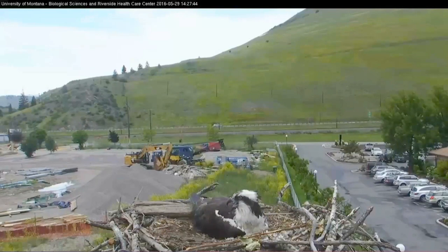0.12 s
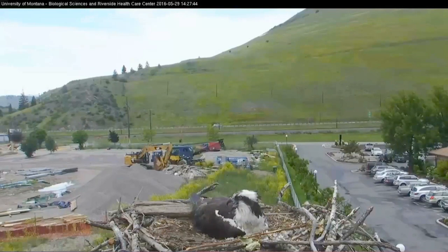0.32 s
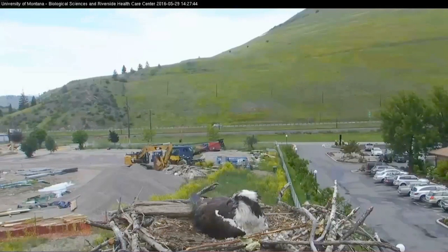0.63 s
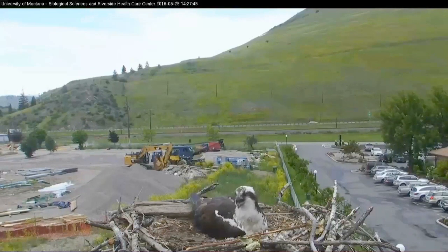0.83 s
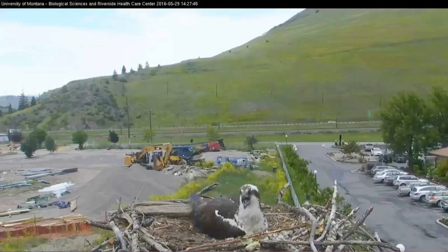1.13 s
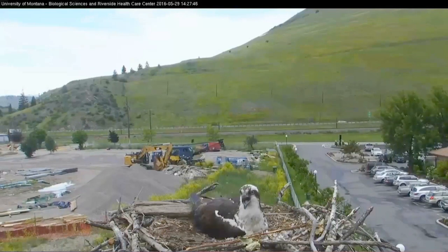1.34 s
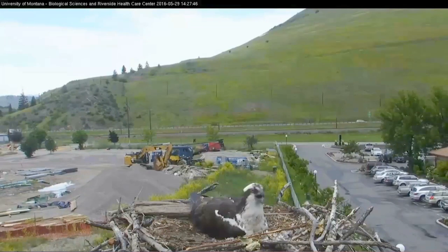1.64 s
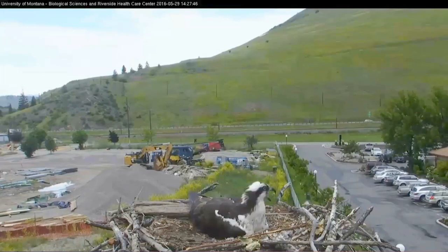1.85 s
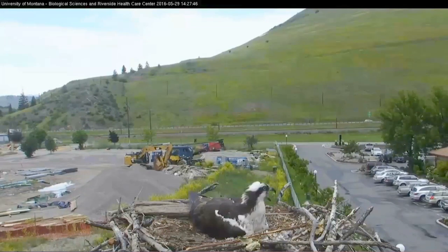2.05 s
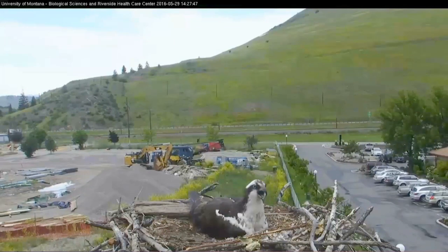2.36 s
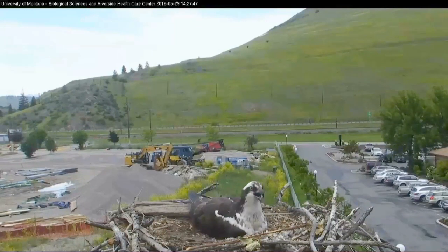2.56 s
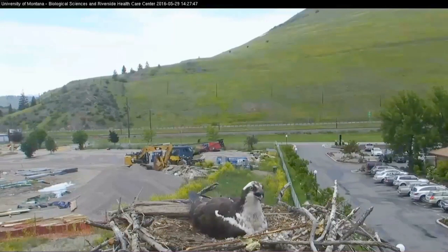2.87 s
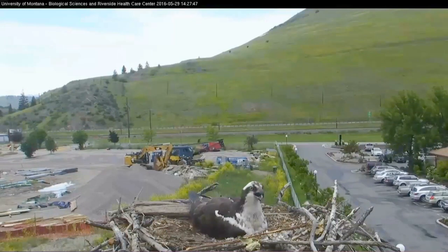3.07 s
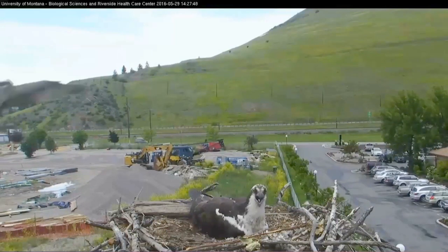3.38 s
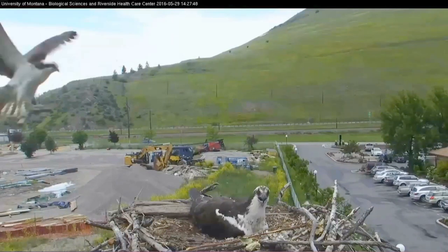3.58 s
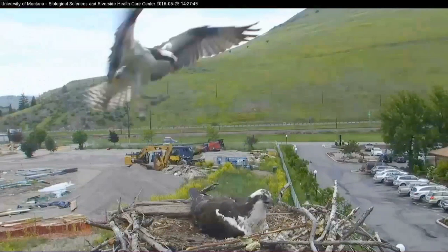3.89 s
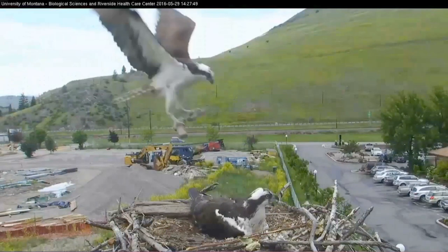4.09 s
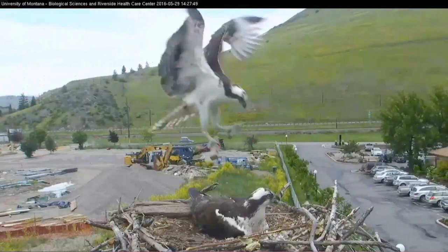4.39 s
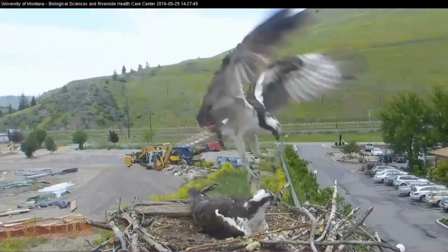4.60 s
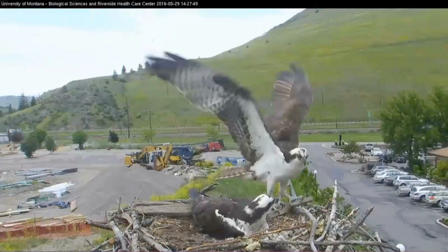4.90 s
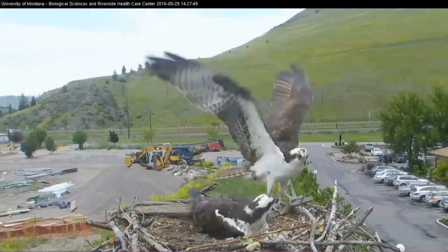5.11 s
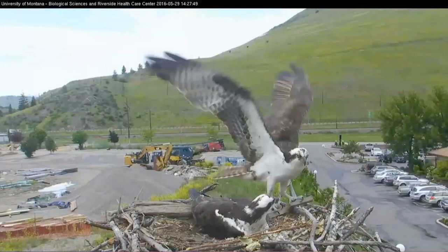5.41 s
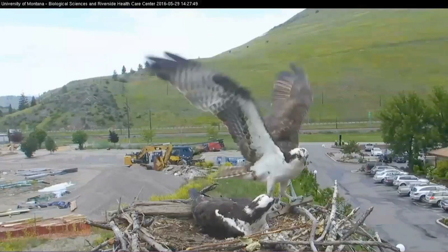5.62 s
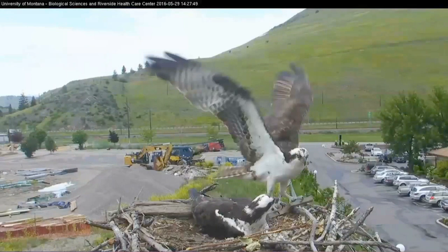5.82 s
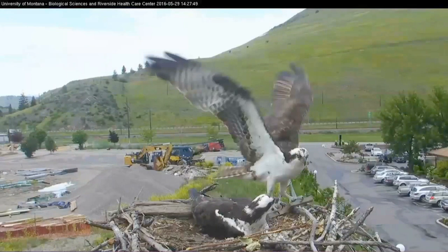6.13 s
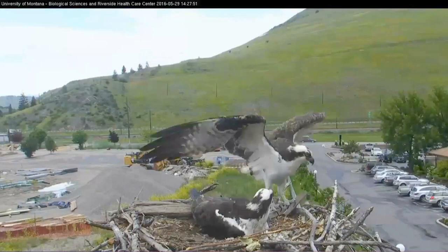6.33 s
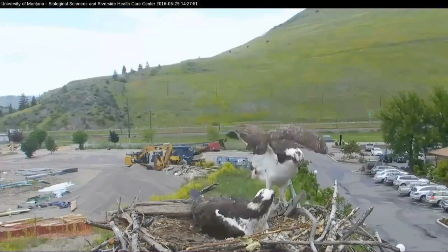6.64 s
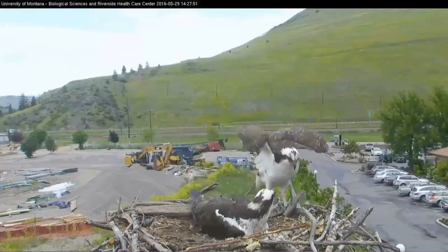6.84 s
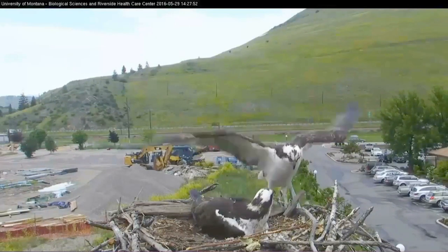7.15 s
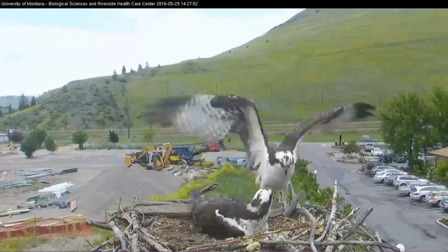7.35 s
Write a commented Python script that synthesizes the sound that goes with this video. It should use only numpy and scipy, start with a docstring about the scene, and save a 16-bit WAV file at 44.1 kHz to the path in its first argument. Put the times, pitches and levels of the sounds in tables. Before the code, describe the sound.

An osprey on its nest whistles a nonstop run of rapid, shrill, cracking chirps, then gentler ones as its mate lands, over faint distant traffic hum.

```python
"""A large raptor on its nest whistles a long run of chirps; each climbs, breaks between registers and falls.
Its mate lands with a short peep and a scrape of sticks; far traffic hums and the slopes send back a faint echo.
Whistles are near sines on drawn pitch paths; breath, scrapes, traffic and echo are shaped noise.
A camera microphone changes the sample rate crudely, which mirrors every whistle."""
import sys
import numpy as np
from scipy import signal
from scipy.fft import rfft, irfft
from scipy.io import wavfile
from scipy.ndimage import uniform_filter1d

SR = 44100
rng = np.random.default_rng(int(sys.argv[2]) if len(sys.argv) > 2 else 0)


def store_wav(level_fs):
    """Save 16-bit WAV to argv[1]."""
    pcm = np.round(np.clip(np.atleast_2d(level_fs), -1, 1) * 32767)
    wavfile.write(sys.argv[1], SR, pcm.T.astype(np.int16))


N = 332073

# Chirps that crack between registers, most of them blown hard, a few softly; five groups each:
# climb (onset_s, pickup_db, onset_db, shelf_hz, end_s, end_hz, end_db),
# squeak (top_s, top_hz, top_db, gap_hz, gap_db),
# plunge (start_s, start_hz, start_db, burst_s, burst_hz, burst_db),
# arch (crest_s, crest_hz, crest_db, leave_s, leave_db), fall (from_hz, break_s, break_db, end_s)
CRACKED_CHIRPS = [
    [(-0.03, -30, -20, 2800, 0.001, 2900, -24), (0.014, 4675, -14, 4750, -15),
     (0.029, 4790, -15, 0.041, 3445, -8), (0.058, 4535, -16, 0.072, -8), (4240, 0.086, -12, 0.1)],
    [(0.184, -21, -9, 2975, 0.207, 2870, -17), (0.223, 5010, -17, 4900, -16),
     (0.231, 4600, -14, 0.243, 3600, -6), (0.259, 4610, -15, 0.273, -10), (4370, 0.287, -13, 0.299)],
    [(0.386, -26, -16, 3125, 0.412, 3050, -23), (0.425, 5600, -26, 3700, -44),
     (0.443, 4565, -27, 0.45, 3670, -6), (0.468, 5400, -18, 0.486, -14), (4500, 0.5, -15, 0.514)],
    [(0.6, -34, -10, 3050, 0.626, 3065, -24), (0.645, 5400, -33, 3800, -46),
     (0.659, 4500, -26, 0.666, 3550, -9), (0.686, 5750, -15, 0.702, -15), (4430, 0.713, -9, 0.725)],
    [(0.816, -28, -11, 2850, 0.834, 2900, -24), (0.857, 5600, -19, 3500, -36),
     (0.876, 4920, -16, 0.884, 3820, -7), (0.901, 5420, -12, 0.92, -10), (4030, 0.933, -11, 0.944)],
    [(1.04, -22, -10, 2800, 1.058, 2975, -27), (1.077, 5900, -20, 3500, -45),
     (1.101, 5050, -21, 1.109, 3950, -3), (1.128, 5520, -10, 1.148, -18), (4200, 1.16, -14, 1.173)],
    [(1.259, -34, -9, 2930, 1.279, 3065, -30), (1.298, 5600, -24, 5800, -52),
     (1.324, 5600, -41, 1.332, 4050, -9), (1.352, 5550, -2, 1.372, -13), (4165, 1.385, -12, 1.397)],
    [(1.485, -26, -13, 2800, 1.503, 2980, -30), (1.52, 5600, -23, 5900, -53),
     (1.547, 5900, -43, 1.554, 4100, -8), (1.576, 5520, -4, 1.593, -17), (4130, 1.607, -13, 1.619)],
    [(1.706, -28, -10, 2880, 1.729, 3070, -30), (1.743, 5400, -21, 3500, -48),
     (1.769, 4715, -26, 1.778, 3725, -7), (1.799, 5700, -3, 1.822, -12), (4210, 1.833, -11, 1.848)],
    [(1.924, -21, -9, 3100, 1.943, 3185, -18), (1.945, 4285, -20, 4150, -22),
     (1.974, 4900, -20, 1.993, 3800, -6), (2.016, 5750, -10, 2.039, -11), (4335, 2.052, -10, 2.065)],
    [(2.152, -21, -11, 3000, 2.183, 3000, -19), (2.199, 5225, -21, 3840, -21),
     (2.208, 4850, -20, 2.221, 3750, -4), (2.24, 4530, -13, 2.259, -11), (4410, 2.272, -10, 2.287)],
    [(2.38, -28, -11, 2930, 2.402, 2800, -20), (2.431, 6600, -20, 3500, -18),
     (2.444, 4650, -15, 2.453, 3495, -8), (2.471, 4380, -13, 2.487, -14), (4350, 2.5, -10, 2.516)],
    [(2.608, -28, -11, 2680, 2.63, 2745, -21), (2.648, 5150, -16, 3700, -54),
     (2.68, 4750, -18, 2.69, 3520, -5), (2.709, 4260, -14, 2.719, -14), (4200, 2.734, -11, 2.753)],
    [(2.848, -34, -17, 2600, 2.862, 2600, -19), (2.885, 5000, -30, 3750, -52),
     (2.916, 4300, -25, 2.922, 3575, -7), (2.943, 4225, -24, 2.957, -14), (3650, 2.969, -16, 2.99)],
    [(3.081, -24, -16, 2780, 3.112, 2900, -28), (3.125, 4865, -23, 5100, -26),
     (3.147, 4300, -22, 3.155, 3450, -8), (3.171, 4040, -17, 3.186, -15), (3680, 3.199, -15, 3.221)],
    [(3.305, -17, -18, 3050, 3.34, 2900, -21), (3.354, 4855, -26, 4950, -30),
     (3.367, 4900, -33, 3.378, 3495, -8), (3.398, 4155, -19, 3.412, -18), (3680, 3.422, -17, 3.444)],
    [(3.529, -19, -21, 2950, 3.544, 3080, -20), (3.548, 3650, -20, 3720, -24),
     (3.582, 3070, -22, 3.6, 3240, -13), (3.62, 3920, -20, 3.634, -18), (3750, 3.646, -17, 3.669)],
    [(6.17, -18, -18, 2750, 6.186, 2900, -18), (6.189, 3150, -18, 2950, -19),
     (6.218, 3150, -17, 6.229, 3150, -10), (6.252, 3020, -11, 6.262, -12), (2980, 6.27, -14, 6.292)],
    [(6.391, -28, -17, 2760, 6.413, 3020, -15), (6.415, 3030, -15, 2870, -20),
     (6.445, 3410, -16, 6.466, 3125, -12), (6.494, 3450, -10, 6.505, -15), (3430, 6.512, -14, 6.536)],
]
STRAIN_HZ = 4250   # above this pitch the voice is strained


def from_db(db):
    """Amplitude gain is ten to the power of a twentieth of the decibels."""
    return 10 ** (np.asarray(db) / 20)


def at_hz(points, hz):
    """Spectrum level, interpolated straight on a logarithmic frequency axis."""
    table_hz, table_db = np.array(points).T
    return np.interp(np.log(hz), np.log(table_hz), table_db)


def coloured(x, spectrum):
    """Spectral shaping: each Fourier component is weighted by the spectrum; the result has rms 1."""
    hz = np.arange(1, len(x) // 2 + 2) * SR / len(x)
    out = irfft(rfft(x) * from_db(at_hz(spectrum, hz)), len(x))
    return out / np.sqrt(np.mean(out ** 2))


def wobble(rate_hz):
    """Random modulation: low-passed white noise of standard deviation 1."""
    low_pass = signal.butter(2, rate_hz, fs=SR, output="sos")
    slow = signal.sosfilt(low_pass, rng.standard_normal(N))
    return slow / np.std(slow)


def traffic():
    """Far traffic and air: broadband noise with a fixed spectrum and a slowly drifting level."""
    # relative density of traffic and air: frequency_hz, level_db (per Hz)
    hum_spectrum = [(100, -33), (170, -10), (250, 0), (370, -8), (740, -32), (1300, -18), (2400, -13),
                    (5200, -21), (6100, -38)]
    level_db = -41 + 1.5 * wobble(4)
    return coloured(rng.standard_normal(N), hum_spectrum) * from_db(level_db)


def slopes(x):
    """Diffuse reverberation: ground and hillside act as exponentially decaying noise convolved with the sound."""
    level_db, t60_s = -36, .5
    tail = rng.standard_normal(SR) * from_db(-60 * np.arange(SR) / SR / t60_s)
    echo = signal.fftconvolve(x, tail / np.sqrt(np.sum(tail ** 2)))[:N]
    return from_db(level_db) * echo


def sticks():
    """Friction noise: claws on sticks give band-limited bursts that start at once and decay exponentially."""
    # scrapes at the landing: start_s, level_db (relative), decay_s
    scrapes = [(4.375, -30, .004), (4.384, -31, .014)]
    t = np.arange(N) / SR
    envelope = sum(from_db(db) * (t > s) * np.exp(-np.abs(t - s) / decay_s) for s, db, decay_s in scrapes)
    band = signal.butter(2, [1600, 6000], "band", fs=SR, output="sos")
    return envelope * signal.sosfilt(band, 2 * rng.standard_normal(N))


def crackle():
    """Loss of periodicity: around each high plunge's start the strained voice splinters into fluttering noise."""
    # relative density of the hoarse noise: frequency_hz, level_db (per Hz)
    hoarse_spectrum = [(2300, -24), (3300, -3), (3800, 0), (4600, -4), (6000, -7), (8500, -9), (11000, -12)]
    level_db = -8   # against the effort at the plunge's start
    lead_s, stop_s, edge_s = .010, .003, .003   # before the start, before the burst, fade length
    t = np.arange(N) / SR
    envelope = np.zeros(N)
    for chirp in CRACKED_CHIRPS:
        start, start_hz, start_db, burst = chirp[2][:4]
        if start_hz > STRAIN_HZ:
            gate = np.clip(np.minimum(t - start + lead_s, burst - stop_s - t) / edge_s, 0, 1)
            envelope += from_db(start_db + level_db) * gate
    return envelope * from_db(3 * wobble(150)) * coloured(rng.standard_normal(N), hoarse_spectrum)


def point(s, hz, db, next_hz):
    """Register break: the pitch jumps only if the next pitch lies over 0.05 away in log frequency."""
    return (s, hz, db, next_hz) if abs(np.log(next_hz / hz)) > .05 else (s, hz, db)


def landing_hz(drop, end):
    """Final glide: a longer last slide starts higher, up to a ceiling."""
    return min(2900, 2020 + 40000 * (end - drop))   # Hz, 40000 Hz per s


def last(drop, end):
    """End of the glide: a hasty slide ends lower."""
    return end, min(2330, 2080 + 11000 * (end - drop)), -21


def climb(on, pickup_db, on_db, shelf_hz, end, end_hz, end_db, hard):
    """Register shift: a low pick-up breaks upwards to a shelf; blown hard, it bursts in and steps up again."""
    attack_s = .006 if hard else 0
    shelf_db = on_db + .33 * (end_db - on_db)
    if hard:
        rise = [(on, 2570, on_db), point(on + .006, min(2660, shelf_hz), shelf_db, shelf_hz)]
    else:
        rise = [(on + .009, shelf_hz, shelf_db)]
    return [(on - attack_s - .008, 1900, pickup_db),
            (on - attack_s, 2070, min(pickup_db, on_db), 2330 if hard else 2620),
            *rise,
            (end, end_hz, end_db)]


def plain(rise, hold, fall):
    """Sustained upper register: one leap, a sag and a crest; rows (s, pitch Hz, effort dB, leap Hz)."""
    *opening, shelf = climb(*rise, False)
    leap, sag, crest = hold[:1], hold[1:4], hold[4:]
    from_hz, drop, db, end = fall
    return opening + [shelf + leap, sag, crest,
                      (drop, from_hz, db, landing_hz(drop, end)), last(drop, end)]


def cracked(rise, squeak, plunge, arch, fall):
    """Unstable registers: a squeak, a gap, a plunge, a hiccup into an arch and a fall; rows as in plain."""
    top, top_hz, top_db, gap_hz, gap_db = squeak
    start, start_hz, start_db, burst, burst_hz, burst_db = plunge
    crest, crest_hz, crest_db, leave, leave_db = arch
    from_hz, drop, db, end = fall
    hard = rise[2] > rise[1]   # onset stronger than pick-up
    high, strained = crest_hz > 5000, start_hz > STRAIN_HZ

    fade = min(.005, (start - top) / 3)
    bend = .07 if gap_hz < min(4050, top_hz) else 0   # a low gap sags in its middle
    gap = [point(top, top_hz, top_db, (1 + bend) * gap_hz),
           (top + fade, gap_hz, gap_db),
           (start - fade, (1 - bend) * gap_hz, gap_db),
           point(start, (1 + bend) * gap_hz, start_db, start_hz)]

    depth, hiccup_s = .95, .004   # pitch ratio of each sag, time between the hiccup's rows
    bottom = burst + .006
    hiccup_hz = min(4050, depth * crest_hz)
    hiccup_db = -21 if high else -11 if strained else crest_db
    hiccup_end = bottom + 2 * hiccup_s
    hiccup = [(burst, burst_hz, burst_db),
              (bottom, min(3320, depth * burst_hz), -28, depth * hiccup_hz),
              (bottom + hiccup_s, hiccup_hz, hiccup_db),
              (hiccup_end, hiccup_hz, -21, crest_hz) if strained else (hiccup_end, crest_hz, crest_db)]

    # a high arch first steps down to 4530 Hz
    step = [(leave - .010, crest_hz, crest_db - 8, 4530)] if high else []
    landing = landing_hz(drop, end)
    descent = [(crest, crest_hz, crest_db), *step,
               point(leave, from_hz, leave_db, min(3530, from_hz)),
               point(drop, min(from_hz, 1.145 * landing), db, landing),
               last(drop, end)]
    return climb(*rise, hard) + gap + hiccup + descent


def voice(calls):
    """Whistle source and throat filter: a near sine with weak octave and breath falters at each register break."""
    # how well the throat passes a pitch: frequency_hz, level_db
    throat = [(1800, -17), (2400, -4), (3000, -3), (3600, 0), (4300, -5), (4800, -11), (5400, -10),
              (6200, -25)]
    # second harmonic under the first: pitch_hz, level_db
    octave = [(1950, -1), (2300, -26), (2680, -14), (3100, -32), (3700, -44)]
    t = np.arange(N) / SR
    pitch, effort, falter = np.ones(N), np.zeros(N), np.zeros(N)
    for rows in calls:
        rows = sorted(rows)
        # a leap puts its second pitch one sample after the first
        leaps = [(r[0] + k / SR, hz) for r in rows for k, hz in enumerate(r[1::2])]
        s = [r[0] for r in rows]
        near = (t > s[0] - .01) & (t < s[-1] + .01)
        now = t[near]
        pitch[near] = np.interp(now, *np.transpose(leaps))
        fade = np.clip(np.minimum(now - s[0], s[-1] - now) / .004 + 1, 0, 1)
        effort[near] = fade * np.interp(now, s, from_db([r[2] for r in rows]))
        for r in rows:
            if len(r) > 3:
                falter[near] += np.exp(-((now - r[0]) / .0018) ** 2)

    # tight membranes, weakly blown, flutter and leak
    strained = uniform_filter1d(1. * (pitch > STRAIN_HZ), size=500)
    weak = effort / (effort ** 2 + .07 ** 2) * .07 * strained

    jitter = (.002 + .06 * weak) * wobble(300)
    phase = 2 * np.pi * np.cumsum(pitch * (1 + jitter)) / SR
    tone = np.sqrt(2) * (np.sin(phase) + from_db(at_hz(octave, pitch)) * np.sin(2 * phase))
    tone *= from_db(at_hz(throat, pitch) + .9 * wobble(60))
    tone *= 1 - np.clip(.7 * falter, 0, 1)

    # the register just left rings on a moment and beats with the new one
    before = np.roll(pitch, round(.006 * SR))
    ringing = np.sin(2 * np.pi * np.cumsum(before) / SR)
    ringing *= .55 * np.roll(falter, round(.003 * SR)) * from_db(at_hz(throat, before))

    air = coloured(rng.standard_normal(N), [(10, -40), *throat])
    breath = from_db(-32) * air
    rasp = from_db(-20.98 + 3 * wobble(90)) * weak * np.diff(air, prepend=0)   # differencing brightens it
    return effort * (tone + ringing + breath) + rasp


def scene():
    """Superposition: the birds, their echo and the traffic add linearly."""
    # the mate's peep: time_s, pitch_hz, effort_db
    mate_peep = [(4.142, 2130, -19), (4.192, 2030, -24)]
    # gentler chirps that leap once and hold, three groups each:
    # climb (onset_s, pickup_db, onset_db, shelf_hz, end_s, end_hz, end_db),
    # hold (leap_hz, sag_s, sag_hz, sag_db, crest_s, crest_hz, crest_db),
    # fall (from_hz, break_s, break_db, end_s)
    gentle_chirps = [
        [(3.752, -19, -20, 2890, 3.769, 2975, -20), (3780, 3.807, 3370, -16, 3.839, 3855, -17),
         (3710, 3.875, -19, 3.898)],
        [(3.989, -21, -18, 2800, 4.012, 3035, -21), (3585, 4.046, 3195, -15, 4.079, 3705, -16),
         (3625, 4.118, -22, 4.136)],
        [(4.226, -14, -21, 2880, 4.244, 3005, -23), (3780, 4.282, 3600, -13, 4.328, 3720, -16),
         (3500, 4.343, -20, 4.365)],
        [(4.461, -13, -18, 2855, 4.48, 2950, -18), (3760, 4.507, 3520, -14, 4.551, 3725, -15),
         (3675, 4.579, -20, 4.599)],
        [(4.709, -17, -19, 2790, 4.733, 2925, -20), (3475, 4.766, 3475, -18, 4.8, 3700, -16),
         (3620, 4.837, -23, 4.858)],
        [(4.969, -13, -23, 2790, 4.991, 2900, -19), (3595, 5.005, 3620, -17, 5.021, 3650, -16),
         (3600, 5.072, -22, 5.094)],
        [(5.202, -16, -20, 2670, 5.233, 2930, -24), (3640, 5.262, 3560, -20, 5.307, 3700, -16),
         (3630, 5.346, -21, 5.368)],
        [(5.463, -15, -23, 2740, 5.489, 2950, -19), (3550, 5.514, 3420, -14, 5.567, 3680, -13),
         (3400, 5.584, -20, 5.607)],
        [(5.702, -17, -18, 2720, 5.727, 2900, -20), (3570, 5.758, 3420, -17, 5.812, 3605, -12),
         (3360, 5.829, -15, 5.849)],
        [(5.939, -19, -16, 2680, 5.96, 2800, -16), (3075, 5.998, 2700, -22, 6.015, 3350, -13),
         (3485, 6.047, -16, 6.073)],
        [(6.628, -18, -19, 2760, 6.65, 2900, -17), (3535, 6.685, 3045, -14, 6.707, 3530, -12),
         (3505, 6.738, -17, 6.761)],
        [(6.881, -22, -19, 2700, 6.918, 3045, -18), (3470, 6.93, 3500, -18, 6.95, 3540, -18),
         (3570, 6.968, -19, 6.997)],
        [(7.125, -19, -23, 2750, 7.161, 3005, -17), (3420, 7.184, 3475, -16, 7.222, 3600, -18),
         (3550, 7.238, -20, 7.261)],
        [(7.36, -17, -18, 2700, 7.397, 2975, -19), (3500, 7.419, 3475, -13, 7.46, 3680, -14),
         (3495, 7.482, -16, 7.511)],
    ]
    background = traffic()
    calls = [cracked(*c) for c in CRACKED_CHIRPS] + [plain(*c) for c in gentle_chirps] + [mate_peep]
    birds = sticks() + crackle() + voice(calls)
    return (background + slopes(birds) + birds)[None]


def record(dry):
    """Saturation and aliasing: peaks round lopsidedly; uneven sample picking puts mirror tones by each whistle."""
    capture_hz, stream_hz = 48000, 22050
    ceiling, lopsided = .9, .05
    rounded = ceiling * np.tanh((dry[0] + lopsided * dry[0] ** 2) / ceiling)
    captured = signal.resample_poly(rounded, capture_hz, SR)
    # each slow sample takes the captured one at or just before its time
    kept = captured[np.arange(N // 2) * capture_hz // stream_hz]
    # back to SR: zeros in between, then low-pass filters
    played = np.zeros(N)
    played[:N - 1:2] = 2 * kept
    played = signal.sosfilt(signal.butter(20, 11150, fs=SR, output="sos"), played)
    return signal.sosfilt(signal.cheby2(12, 70, 12000, fs=SR, output="sos"), played)[None]


dry = scene()
out = record(dry)
store_wav(out)
```